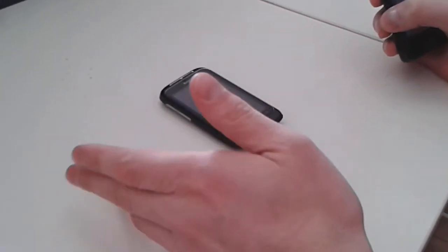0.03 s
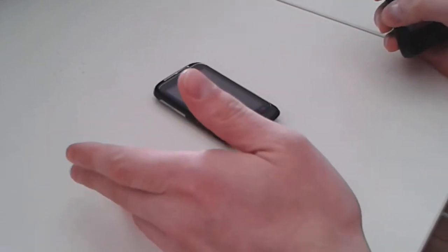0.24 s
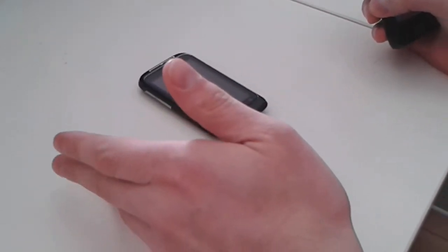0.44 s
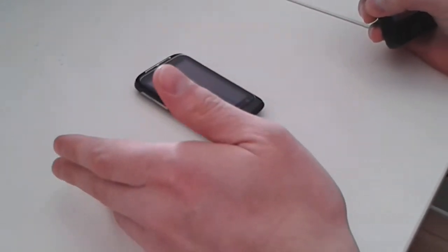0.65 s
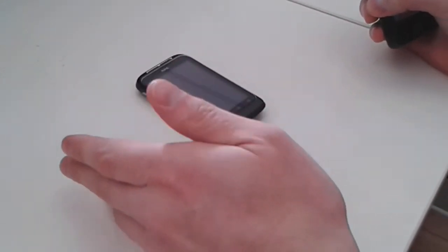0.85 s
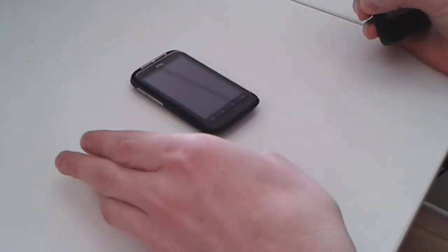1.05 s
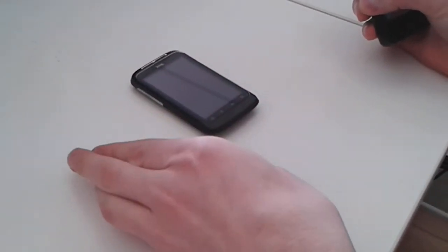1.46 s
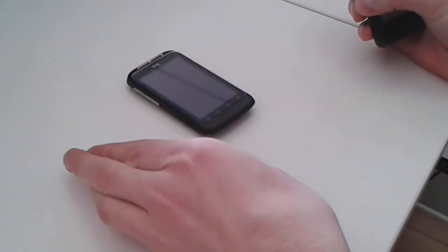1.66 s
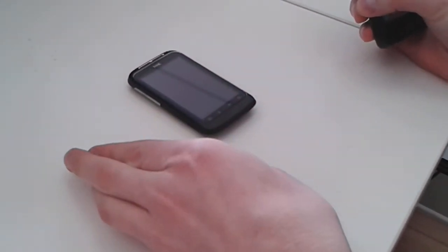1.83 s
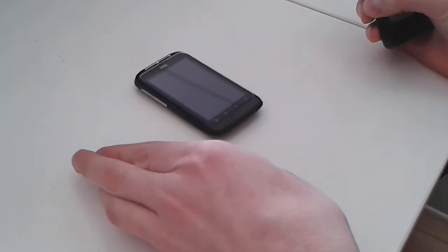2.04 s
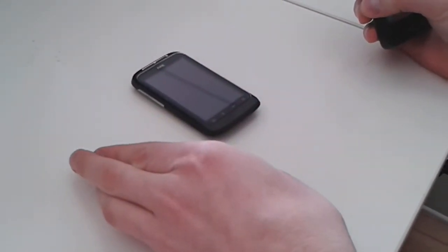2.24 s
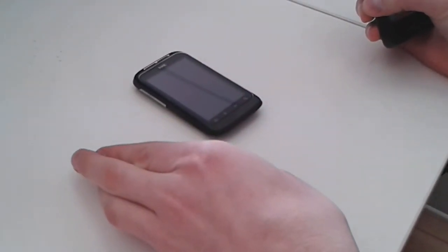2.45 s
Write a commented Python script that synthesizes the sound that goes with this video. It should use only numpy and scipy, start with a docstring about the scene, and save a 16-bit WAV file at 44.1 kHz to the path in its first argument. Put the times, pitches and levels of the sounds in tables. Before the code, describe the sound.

A vehicle engine outside hums low, heard from a quiet room over faint rumble and steady hiss. From the start it slowly revs up, booming unevenly, while a growl, a whine and a thin hiss grow from about 0.6 seconds. At 1.3 seconds a low throb swells and something loose rattles briefly. From 1.9 seconds the engine eases off, falling in pitch and level until about 2.6 seconds.

```python
"""A motor, most likely a vehicle outside, is heard from a quiet room, over faint rumble and steady hiss.
It revs up slowly, its three lowest orders (harmonics of the firing rate) booming in turn.
Under load a growl near 700 Hz, a whine and a thin hiss grow. At 1.3 s, near top speed, a low throb
swells and a loose part rattles briefly. From 1.9 s the motor eases off, falling in pitch and level."""
import sys
import numpy as np
from scipy import signal
from scipy.fft import rfft, irfft
from scipy.io import wavfile

SR = 44100
rng = np.random.default_rng(int(sys.argv[2]) if len(sys.argv) > 2 else 0)


def master_out(mix):
    """Clip the mix to full scale and print it as 16-bit PCM to the path in sys.argv[1]."""
    frames = np.transpose(np.atleast_2d(mix))
    ceiling = np.clip(frames, -1, 1)
    pcm = np.round(ceiling * 32767).astype(np.int16)
    wavfile.write(sys.argv[1], SR, pcm)


N = 114660
T = np.arange(N) / SR
HZ = np.maximum(np.fft.rfftfreq(N, 1 / SR), 1)


def from_db(db):
    """Amplitude ratio: a factor of ten per 20 dB."""
    return 10 ** (np.asarray(db) / 20)


def rms_one(x):
    """Normalisation to unit power."""
    return x / np.sqrt(np.mean(x ** 2) + 1e-20)


def in_time(rows):
    """Linear interpolation of a control curve at every sample."""
    return np.interp(T, *np.transpose(rows))


def gain_at(spectrum, hz):
    """Frequency response, interpolated in decibels over log frequency."""
    points, db = np.transpose(spectrum)
    return from_db(np.interp(np.log(hz), np.log(points), db))


def noise(spectrum, gate=1):
    """Spectral shaping of gated white noise, falling steeply beyond the table's ends; unit power."""
    low_cut = 1 + (spectrum[0][0] / HZ) ** 4
    high_cut = 1 + (HZ / spectrum[-1][0] / 1.4) ** 8
    white = rfft(rng.standard_normal(N) * gate)
    return rms_one(irfft(white * gain_at(spectrum, HZ) / low_cut / high_cut, N))


def drift(corner_hz):
    """Low-passed noise: a slow random fluctuation of unit variance."""
    wander = irfft(rfft(rng.standard_normal(N)) / (1 + (HZ / corner_hz) ** 2), N)
    return rms_one(wander - wander.mean())


def firing(phase, depth, uneven):
    """Amplitude modulation: one swell per firing, alternately strong and weak."""
    return np.exp(depth * np.cos(phase) + uneven * np.cos(phase / 2))


def order_tone(phase, rough, flutter_hz):
    """Random modulation of amplitude and phase broadens one order's spectral line; unit power."""
    flutter = 1 + rough * (drift(flutter_hz) + 1j * drift(flutter_hz))
    carrier = np.exp(1j * (phase + rng.uniform(0, 2 * np.pi)))
    return rms_one(np.real(flutter * carrier))


def room_floor(level_db=-63.5):
    """Stationary noise, strongest in the bass: the room's rumble and hiss."""
    # background spectrum: f/Hz, relative level/dB
    spectrum = [(22, -2), (30, 25), (38, 21.5), (60, 25.5), (150, 21), (400, 14), (1000, 11), (3000, 3.5),
                (7000, 0.5), (16000, -2)]
    return from_db(level_db) * noise(spectrum)


def hiss(phase):
    """A treble band of noise, weakly modulated at the firing rate."""
    # hiss envelope: t/s, level/dB
    level = [(0, -67.5), (.2, -74.5), (.6, -69.5), (1.0, -69.5), (1.3, -66), (1.4, -59), (1.58, -68),
             (1.73, -65), (1.82, -70), (1.9, -77.5), (2.6, -82)]
    # hiss spectrum: f/Hz, relative level/dB
    spectrum = [(3000, -11.5), (4100, -9), (4800, -5.5), (5300, -6), (5750, -2.5), (6200, -10.5),
                (6800, -19), (9000, -30)]
    return from_db(in_time(level)) * noise(spectrum, firing(phase, depth=0.1, uneven=0.023))


def rush(phase):
    """Broadband motor noise, barely modulated by the firings."""
    # rush envelope: t/s, level/dB
    level = [(0, -60), (.3, -58), (.8, -54.5), (1.3, -53), (1.5, -54.5), (1.75, -54), (1.9, -61.5),
             (2.28, -64.5), (2.4, -67), (2.6, -87)]
    # rush spectrum: f/Hz, relative level/dB
    spectrum = [(150, 9), (300, 0.5), (460, -1), (680, -1), (900, -3), (1150, -10), (2100, -11.5),
                (3000, -16.5), (4200, -26), (6000, -26.5), (8000, -35.5), (15000, -28)]
    return from_db(in_time(level)) * noise(spectrum, firing(phase, depth=0.066, uneven=0.023))


def throb(phase):
    """Deep modulation by uneven firings makes low noise pulse."""
    # throb envelope: t/s, level/dB
    level = [(0, -61.5), (.45, -56), (.9, -61.5), (1.28, -48.5), (1.36, -41.5), (1.45, -46.5), (1.7, -56.5),
             (1.95, -59), (2.25, -56.5), (2.38, -61.5), (2.6, -59.5)]
    # throb spectrum: f/Hz, relative level/dB
    spectrum = [(30, -26), (55, -25), (85, -6), (120, -0.5), (205, -2.5), (230, -7.5), (258, -2), (290, -8),
                (340, -12), (500, -12), (1000, -56)]
    return from_db(in_time(level)) * noise(spectrum, firing(phase, depth=0.74, uneven=0.45))


def rattle(phase, start_s=1.332, level_db=-36):
    """Forced vibration: a loose part, shaken at the firing rate, chatters into its damped modes."""
    # modes of the part: f/Hz, bandwidth/Hz, relative level/dB
    modes = [(604.2, 28, 3), (694, 114, 2.5), (923, 54, -1), (1257, 33, -5), (1433, 92, -6.5),
             (1707, 54, -8), (2074, 130, -6.5), (2356, 110, -11.5), (2690, 120, -14), (3420, 500, -18),
             (5100, 350, -16.5), (5710, 660, -18.5)]
    attack_s, hold_s, fall_db_per_s, top_hz = 0.027, 0.043, 112, 6500
    age = T - start_s
    decay = from_db(-fall_db_per_s * np.maximum(age - attack_s - hold_s, 0))
    envelope = np.clip(age / attack_s, 0, 1) * decay
    contacts = rng.standard_normal(N) * firing(phase, depth=0.078, uneven=0.066)
    ringing = 0
    for k, (hz, width, db) in enumerate(modes):
        radius = np.exp(-np.pi * width / SR)
        feedback = [1, -2 * radius * np.cos(2 * np.pi * hz / SR), radius * radius]
        mode = rms_one(signal.lfilter([1, 0, -1], feedback, contacts))
        ringing += (-1) ** k * from_db(db) * mode
    ringing = signal.sosfilt(signal.butter(4, top_hz, fs=SR, output="sos"), ringing)
    return from_db(level_db) * envelope * rms_one(ringing)


def growl(phase, firing_hz, half_order_db=-7, grit_db=-3):
    """Source and filter: orders, weaker half orders and pulsed noise excite fixed resonances."""
    # growl envelope: t/s, level/dB
    level = [(0, -100), (.3, -62.5), (.65, -53), (.92, -49.5), (1.12, -45.5), (1.31, -43.5), (1.39, -44),
             (1.5, -47), (1.63, -46.5), (1.8, -51), (1.88, -61), (2.05, -68), (2.6, -81)]
    # response of the resonances: f/Hz, relative level/dB
    response = [(270, -6.5), (385, -13), (455, -25.5), (520, -9.5), (560, -20.5), (605, 1.5), (640, -7.5),
                (685, 0), (790, -12), (890, -7), (1050, -19), (1500, -26.5)]
    tones = 0
    for k in range(7, 38):  # orders 3.5 to 18.5
        tone = order_tone(k / 2 * phase, rough=0.8, flutter_hz=8.2)
        tones += tone * gain_at(response, k / 2 * firing_hz) * from_db(half_order_db * (k % 2))
    grit = noise(response, firing(phase, depth=0.5, uneven=0.18))
    return from_db(in_time(level)) * rms_one(rms_one(tones) + from_db(grit_db) * grit)


def whine(phase):
    """Four higher harmonics, roughened by modulation, swell in turn out of the growl."""
    # envelopes of orders 4, 5, 7 and 9: t/s, level/dB
    fourth = [(0, -55.5), (0.101, -63.5), (.3, -66), (.46, -60), (.6, -62.5), (.82, -55.5), (.95, -71),
              (1.501, -66), (1.9, -68), (2.6, -78.5)]
    fifth = [(0, -68.5), (0.502, -74), (.72, -55), (.95, -63.5), (1.08, -51.5), (1.22, -65), (1.7, -63),
             (2.0, -75), (2.6, -90)]
    seventh = [(0, -93), (1.5, -80), (1.62, -62), (1.72, -55.5), (1.81, -50.5), (1.86, -63), (1.93, -60),
               (1.999, -81), (2.6, -75)]
    ninth = [(0, -85), (.6, -66), (.8, -56), (0.951, -44), (1.08, -63.5), (1.201, -53), (1.36, -47.5),
             (1.48, -61.5), (1.9, -79), (2.6, -84)]
    return sum(from_db(in_time(level)) * order_tone(k * phase, rough=0.36, flutter_hz=22)
               for k, level in ((4, fourth), (5, fifth), (7, seventh), (9, ninth)))


def boom(phase):
    """Periodic firing gives a harmonic series; its three lowest orders are nearly pure tones."""
    # envelopes of orders 1, 2 and 3: t/s, level/dB
    first = [(0, -62), (0.111, -55.5), (.33, -50), (.47, -55), (0.579, -63), (.67, -48), (.85, -40.5),
             (1.0, -43), (1.18, -44), (1.29, -50.5), (1.38, -43), (1.62, -48), (1.73, -75), (1.81, -50),
             (1.879, -69), (1.96, -51), (2.12, -54), (2.3, -52.5), (2.38, -64.5), (2.6, -74)]
    second = [(0, -77), (.15, -66), (.32, -52), (.66, -43.5), (.95, -41.5), (1.02, -47.5), (1.09, -57.5),
              (1.179, -45), (1.29, -55), (1.35, -42.5), (1.47, -42.5), (1.621, -40), (1.74, -62.5),
              (1.84, -59.5), (1.96, -62), (2.08, -60.5), (2.22, -55.5), (2.33, -64), (2.6, -80)]
    third = [(0, -69), (0.152, -61.5), (.3, -54.5), (.5, -46), (0.678, -46), (.85, -50.5), (1.0, -56),
             (1.15, -49), (1.28, -44), (1.42, -53), (1.62, -48.5), (1.75, -62), (1.88, -60), (2.0, -81),
             (2.6, -69)]
    return sum(from_db(in_time(level)) * order_tone(k * phase, rough=0.095, flutter_hz=18)
               for k, level in enumerate((first, second, third), 1))


def scene():
    """Superposition: the motor's layers share the phase of one rotation, over the room's floor."""
    # firing rate of the motor: t/s, f/Hz
    firing_rate = [(0, 64.33), (.11, 66.1), (.32, 67.85), (.59, 71.6), (.85, 74.92), (1.0, 76),
                   (1.12, 79.83), (1.29, 79.77), (1.44, 83.12), (1.58, 82.4), (1.7, 86.06), (1.88, 86.56),
                   (1.96, 79.5), (2.06, 75.7), (2.21, 68.73), (2.33, 62.94), (2.6, 58.3)]
    firing_hz = in_time(firing_rate) * (1 + 0.0029 * drift(corner_hz=8.5))
    phase = 2 * np.pi * np.cumsum(firing_hz) / SR
    motor_noise = throb(phase) + rush(phase) + hiss(phase)
    background = room_floor()
    motor_orders = boom(phase) + whine(phase) + growl(phase, firing_hz)
    return (background + motor_noise + motor_orders + rattle(phase))[None]


def record(dry, cutoff_hz=15800):
    """Band limiting: a steep low-pass removes the highest treble."""
    return irfft(rfft(dry) / (1 + (HZ / cutoff_hz) ** 700), N)


dry = scene()
out = record(dry)
master_out(out)
```